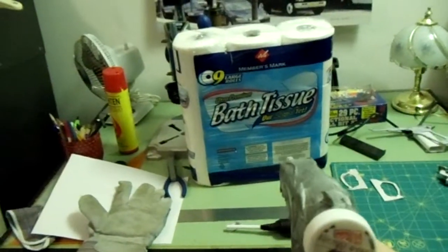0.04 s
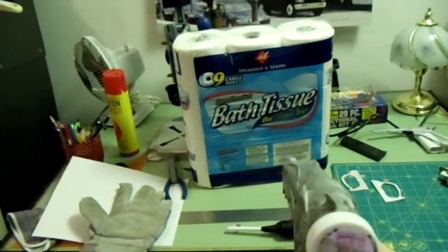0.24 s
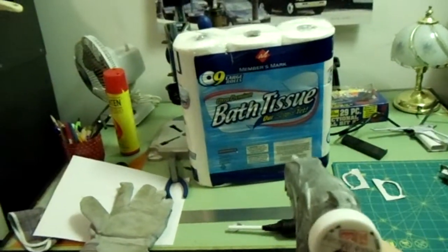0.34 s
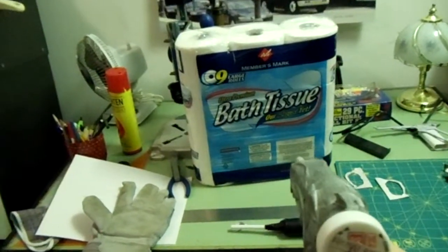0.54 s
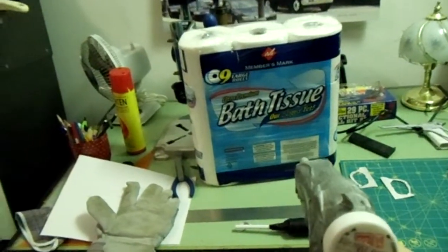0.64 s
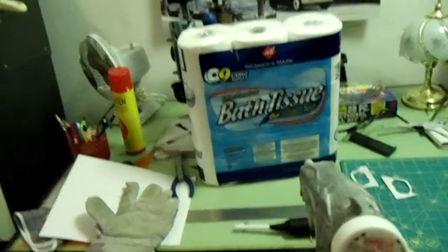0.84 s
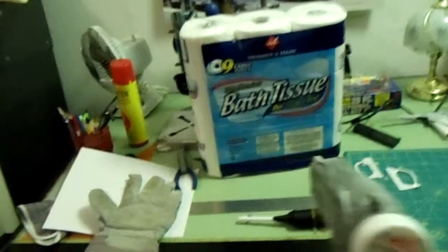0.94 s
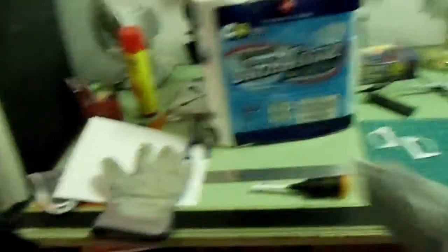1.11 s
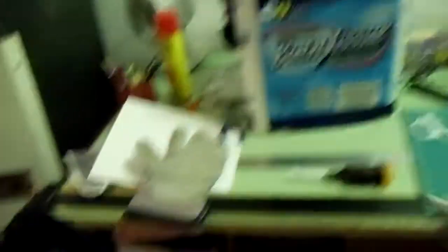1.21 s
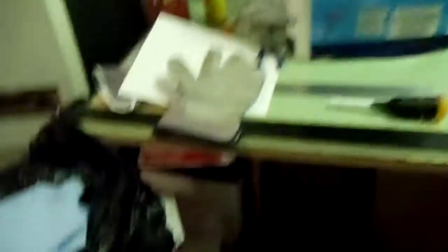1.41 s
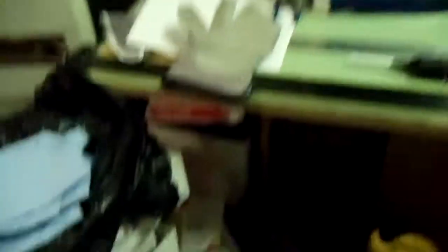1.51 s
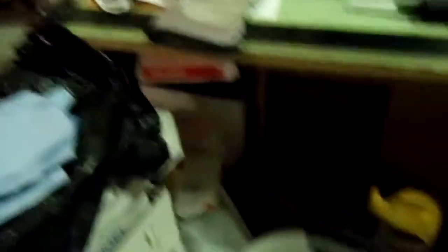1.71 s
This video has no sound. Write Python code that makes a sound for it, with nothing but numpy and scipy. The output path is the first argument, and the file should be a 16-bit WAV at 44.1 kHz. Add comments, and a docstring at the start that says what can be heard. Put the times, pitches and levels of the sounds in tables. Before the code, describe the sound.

A homemade toy pistol fires at about 0.2 seconds: a quick double trigger snap and a sharp bang that overloads the microphone and dies quickly in a small room. At 0.5 seconds a flying part hits something hard, ringing briefly. From 0.8 to 1.2 seconds pieces bounce with bright ticks and two dull knocks. Soft handling taps come near 1.4 seconds. Low rumble and a faint whine continue underneath.

```python
"""Two trigger snaps over low room rumble and hum, then the bang of a homemade toy pistol above a desk.
The bang (pressure pulse, gas rush, ringing, wall echo) fills a small room and overloads the microphone.
A flying part strikes something hard that rings briefly; light pieces bounce with bright ticks and dull
knocks. Soft handling taps follow. A camera whines faintly throughout."""
import sys
import numpy as np
from scipy import signal
from scipy.fft import rfft, irfft
from scipy.io import wavfile
from scipy.ndimage import uniform_filter1d

SR = 44100
rng = np.random.default_rng(int(sys.argv[2]) if len(sys.argv) > 2 else 0)


def unload_wav(signal):
    """Save mono or channel-first audio to the path in sys.argv[1] as 16-bit WAV at rate SR, clipped to [-1, 1]."""
    wavfile.write(
        sys.argv[1],
        SR,
        np.round(np.clip(np.atleast_2d(signal).T, -1, 1) * 32767).astype(np.int16),
    )


N = 77175
CONTACT_RISE_S = 0.00061


def amp(db):
    """Decibels to gain."""
    return 10 ** (np.asarray(db) / 20)


def unit(x):
    """Scale to rms 1."""
    return x / np.sqrt(np.mean(x ** 2) + 1e-20)


def read(points, hz):
    """Interpolate a table on a log-frequency axis."""
    f, value = np.transpose(points)
    return np.interp(np.log(hz + 1), np.log(f + 1), value)


def add(mix, start_s, sound):
    """Mix a sound in at start_s."""
    part = mix[round(start_s * SR):][:len(sound)]
    part += sound[:len(part)]


def coloured(x, colour, edge_hz=None, size=4096):
    """Minimum-phase filter of unit energy, with an optional steep treble edge."""
    hz = abs(np.fft.fftfreq(size, 1 / SR))
    gain = amp(read(colour, hz))
    if edge_hz:
        gain = gain / np.sqrt(1 + (hz / edge_hz) ** 12)
    log_gain = np.log(unit(gain) + 1e-5)
    response = np.fft.ifft(np.exp(np.conj(signal.hilbert(log_gain)))).real
    return signal.fftconvolve(x, response[:size // 2])[:len(x)]


def room_tail():
    """Unit-energy reflections: a quick cloud off the desk, and a tail with a decay time per band."""
    # room decay (frequency [Hz], t60 [s])
    room_t60 = [(60, 0.12), (250, .17), (600, .24), (1500, .26), (3500, 0.27), (7000, 0.28), (13000, .24)]
    early_db, early_t60_s, build_s = 3, .09, .002
    hz, t, spectrum = signal.stft(rng.standard_normal(SR), SR, nperseg=256)
    early = amp(early_db - 60 * t / early_t60_s)
    late = amp(-60 * t / read(room_t60, hz)[:, None])
    tail = signal.istft(spectrum * np.hypot(late, early), SR, nperseg=256)[1][:SR]
    tail *= 1 - np.exp(-np.arange(SR) / SR / build_s)
    return tail / np.linalg.norm(tail)


def burst(db, t60_s, room_db, rise_s=CONTACT_RISE_S):
    """Dense, fast-dying vibration plus reflections at room_db relative to it."""
    t = np.arange(SR) / SR
    envelope = (1 - np.exp(-t / rise_s)) * amp(db - 60 * t / t60_s)
    direct = envelope * rng.choice([-1, 1], SR)
    return direct + amp(room_db) * np.linalg.norm(envelope) * room_tail()


def ring(modes):
    """Decaying sines of random polarity."""
    t = np.arange(SR) / SR
    return sum(rng.choice([-1, 1]) * amp(db - 60 * t / t60_s) * np.sin(2 * np.pi * hz * t)
               for hz, db, t60_s in modes)


def noise(gain):
    """Steady noise of rms 1, shaped by a gain per frequency bin."""
    return unit(irfft(rfft(rng.standard_normal(N)) * gain, N))


def room_tone():
    """Broad rumble and hiss, plus a narrow noise band of hum."""
    # rumble and hiss spectrum (frequency [Hz], relative density [dB])
    floor_colour = [(10, -5), (25, 1), (40, -4.5), (70, -14), (95, -17.5), (150, -19), (250, -25.5),
                    (370, -26), (550, -34), (850, -36), (1500, -42.5), (3000, -46.5), (7000, -53),
                    (11000, -55.5), (14000, -58)]
    # hum band (centre [Hz], width [Hz], level [dB])
    hum_hz, width_hz, hum_db = (110, 4, -57)
    floor_db = -40.5
    hz = np.fft.rfftfreq(N, 1 / SR)
    rumble = amp(floor_db) * noise(amp(read(floor_colour, hz)))
    hum = amp(hum_db) * noise(np.exp(-2 * ((hz - hum_hz) / width_hz) ** 2))
    return rumble + hum


def camera_whine():
    """Faint electrical tone, switching on with each frame."""
    whine_hz, whine_db = 7870, -68.5
    frame_hz, start_s, duty = 15, .031, .52
    t = np.arange(N) / SR
    on = (t - start_s) * frame_hz % 1 < duty
    gate = uniform_filter1d(on.astype(float), size=128)
    return gate * amp(whine_db) * np.sin(2 * np.pi * whine_hz * t)


def handling():
    """Soft, damped taps of handling."""
    # taps (time [s], level [dB])
    taps = [(1.3520, -42.5), (1.3865, -53)]
    # tap spectrum (frequency [Hz], relative gain [dB])
    tap_colour = [(300, -12), (1300, -4), (2700, -6), (3600, 0.5), (4800, -8), (7000, -15), (13000, -23)]
    out = np.zeros(N)
    for s, db in taps:
        add(out, s, coloured(burst(db, t60_s=.017, room_db=-10), tap_colour))
    return out


def light_pieces():
    """Light pieces bounce; each bright tick starts with a sharp contact spike."""
    # bounces (time [s], level [dB], room send [dB])
    ticks = [(0.7734, -26.5, -1.5), (0.7777, -26.5, -4), (0.9876, -33.5, -3.5), (1.1172, -40, -5),
             (1.1300, -52, 0), (1.1888, -51.5, -6), (1.2052, -49.5, -6)]
    # tick spectrum (frequency [Hz], relative gain [dB])
    tick_colour = [(300, -28), (1200, -16), (2500, -10.5), (4500, -2.5), (6300, 1), (9000, -0.5),
                   (11500, -4), (14000, -5)]
    spike_boost_db = 10
    out = np.zeros(N)
    for s, db, room_db in ticks:
        spike = amp(db + spike_boost_db) * signal.unit_impulse(SR)
        add(out, s, coloured(spike + burst(db, t60_s=.019, room_db=room_db), tick_colour))
    return out


def dull_piece():
    """A duller piece knocks twice, ringing briefly."""
    # bounces (time [s], level [dB], room send [dB], treble edge [Hz])
    knocks = [(0.9217, -16, -4.5, 4430), (1.0337, -31.5, -6.5, 2520)]
    # knock spectrum before the treble edge (frequency [Hz], relative gain [dB])
    knock_colour = [(150, -26), (400, -19.5), (650, -14.5), (850, -14), (1050, -1.5), (1700, 0.5),
                    (2400, -1), (3200, -6.5), (4500, -7.5), (7000, -13.5), (13000, 8)]
    # modes of the piece (frequency [Hz], level re knock [dB], t60 [s])
    knock_modes = [(1000, -15, 0.091), (1272, -17, 0.1), (1722, -11, .06), (2361, -19, .08)]
    out = np.zeros(N)
    for s, db, room_db, edge_hz in knocks:
        knock = coloured(burst(db, t60_s=.028, room_db=room_db), knock_colour, edge_hz)
        add(out, s, knock + amp(db) * ring(knock_modes))
    return out


def impact():
    """A flying part hits a hard object, which rings; just after the hit the desk answers with a hollow body
    tone."""
    # hit and second contact (time [s], level [dB])
    clacks = [(.5040, -7), (.5059, -4.5)]
    # contact spectrum (frequency [Hz], relative gain [dB])
    clack_colour = [(100, -46.5), (250, -28), (450, -17), (700, -25), (1100, -17), (2000, -11.5),
                    (2700, -14), (3600, 3), (4300, -0.5), (4900, -5), (6400, -3), (7500, -10.5),
                    (10000, -16.5), (14000, -26)]
    # modes of the object (frequency [Hz], level [dB], t60 [s])
    clack_modes = [(3653, -15.5, 0.056), (4050, -30, 0.21), (4110, -26.5, .28), (4161, -31.5, .33),
                   (4265, -28, 0.29), (6383, -16.5, .04)]
    # spectrum of the desk's hollow body tone (frequency [Hz], relative gain [dB])
    hollow_colour = [(100, -29), (300, -15), (460, -1.5), (620, -10), (850, -3.5), (1100, 2.5), (1400, -5),
                     (2000, -0.5), (2700, -4.5), (4000, -20), (12000, -37.5)]
    hit_s, hollow_s = clacks[0][0], .5075
    out = np.zeros(N)
    for s, db in clacks:
        add(out, s, coloured(burst(db, t60_s=.023, room_db=-5.5, rise_s=.0001), clack_colour))
    add(out, hit_s, ring(clack_modes))
    add(out, hollow_s, coloured(burst(db=-19.5, t60_s=.1, room_db=-4, rise_s=.0026), hollow_colour))
    return out


def trigger():
    """Two sharp snaps of the trigger just before the bang."""
    # snaps (time [s], level [dB])
    snaps = [(0.2041, 1.5), (0.2154, 4)]
    # snap spectrum (frequency [Hz], relative gain [dB])
    snap_colour = [(100, -30), (400, -21), (900, -3.5), (1400, -7.5), (2000, -2), (2600, -3), (3300, -1),
                   (4200, -0.5), (5000, -9), (8000, -19), (14000, -26)]
    out = np.zeros(N)
    for s, db in snaps:
        add(out, s, coloured(burst(db, t60_s=.0061, room_db=-7, rise_s=.00005), snap_colour))
    return out


def bang():
    """Pressure pulse and gas rush; barrel and room ring, and the walls return a duller echo."""
    # gas rush spectrum (frequency [Hz], relative gain [dB])
    rush_colour = [(30, -6.5), (70, 1.5), (150, 5.5), (400, 7), (600, -1), (900, 0.5), (1400, -1.5),
                   (2100, -6), (3200, -0.5), (5500, -11), (8000, -9), (12500, -12), (15000, -21)]
    # barrel and room modes (frequency [Hz], level [dB], t60 [s])
    bang_modes = [(32, -17, .6), (115, -10.5, .14), (168.6, -8.5, .22), (404, -5.5, 0.14),
                  (471.4, -16, .27), (686, -12.5, 0.24), (855, -20, .18), (1190, -19, .26),
                  (1343.5, -18, .24), (1925, -23, 0.21), (2864, -21.5, .24), (3025, -21.5, 0.33)]
    bang_s, pulse_db, pulse_s = .2171, 10, .0006
    rush_db, rush_t60_s = 5, .08
    echo_delay_s, echo_gain_db = .0265, -8
    u = np.arange(SR) / SR / pulse_s
    pulse = -amp(pulse_db) * (1 - u) * np.exp(-u)
    rush = coloured(burst(rush_db, rush_t60_s, room_db=1, rise_s=.0006), rush_colour)
    out = np.zeros(N)
    add(out, bang_s, pulse + rush + ring(bang_modes))
    echo = burst(rush_db + echo_gain_db, rush_t60_s, room_db=-12.5, rise_s=.0013)
    add(out, bang_s + echo_delay_s, coloured(echo, rush_colour, edge_hz=7000))
    return out


def scene():
    """Shot, aftermath and background at one microphone."""
    shot = trigger() + bang()
    aftermath = impact() + light_pieces() + dull_piece() + handling()
    return (shot + aftermath + room_tone() + camera_whine())[None]


def record(dry):
    """Hard-knee microphone overload, then a low-pass."""
    ceiling, hardness, cutoff_hz = 1.02, 6, 14250
    overloaded = dry / (0.5 + abs(dry / ceiling) ** hardness) ** (1 / hardness)
    lowpass = signal.firwin(255, cutoff_hz, window=("kaiser", 8), fs=SR)
    return signal.oaconvolve(overloaded, lowpass[None], "same")


dry = scene()
out = record(dry)
unload_wav(out)
```